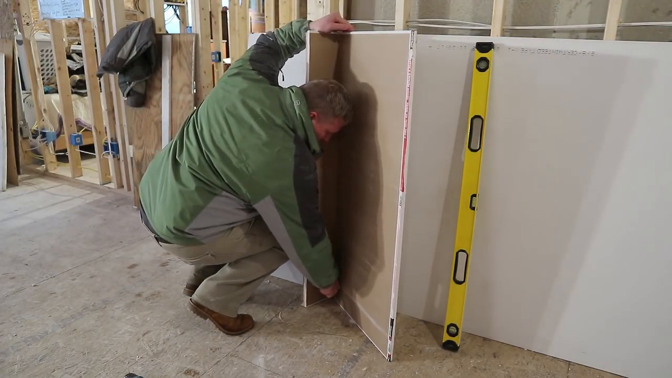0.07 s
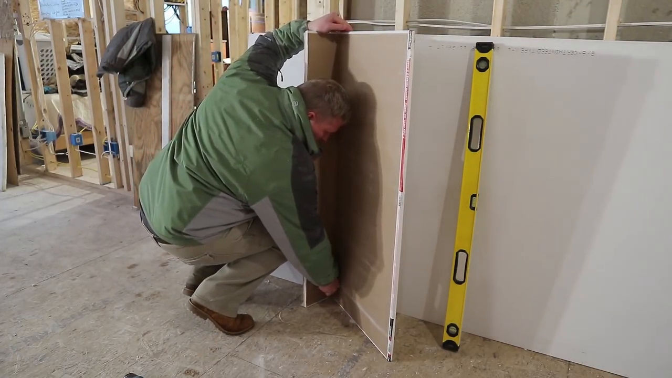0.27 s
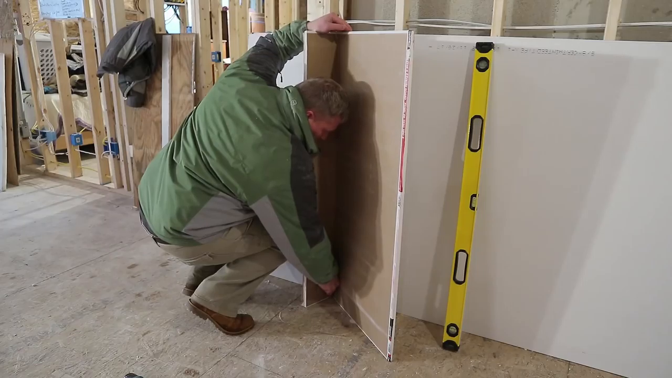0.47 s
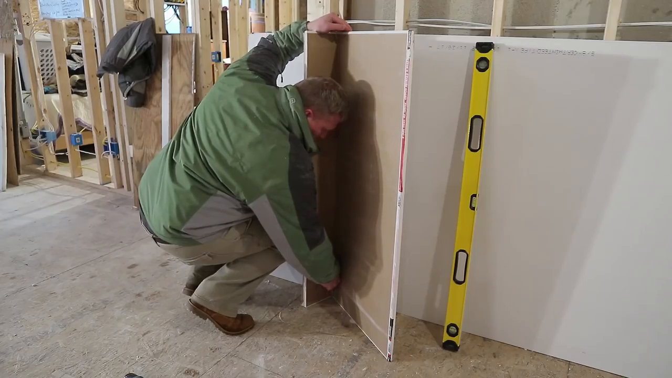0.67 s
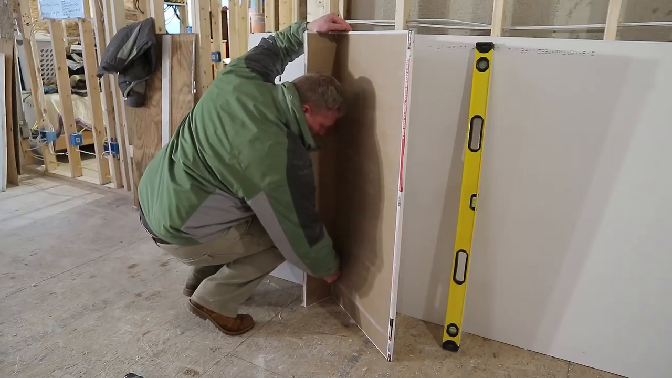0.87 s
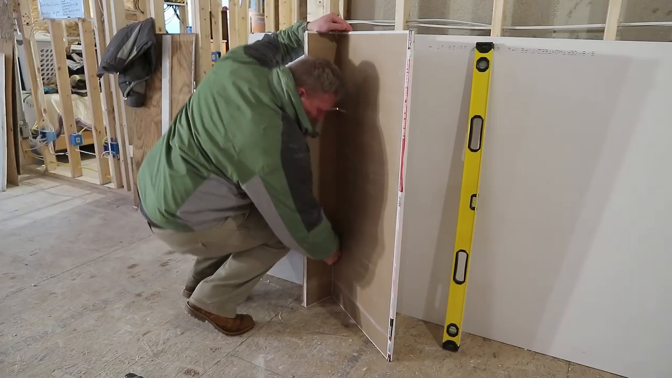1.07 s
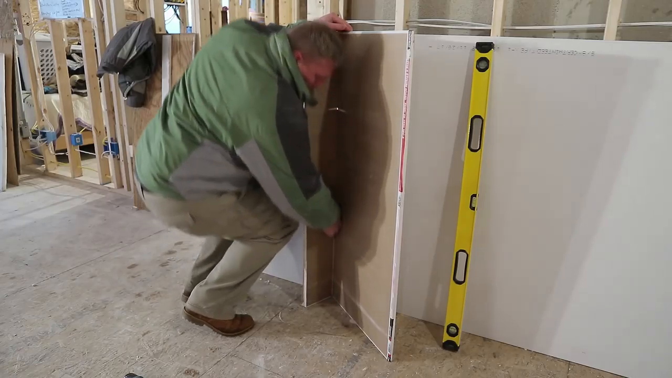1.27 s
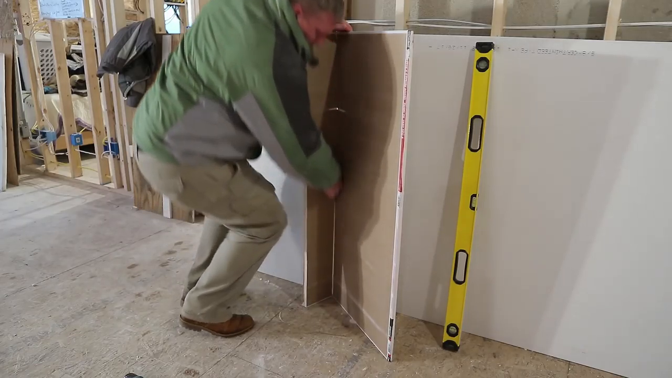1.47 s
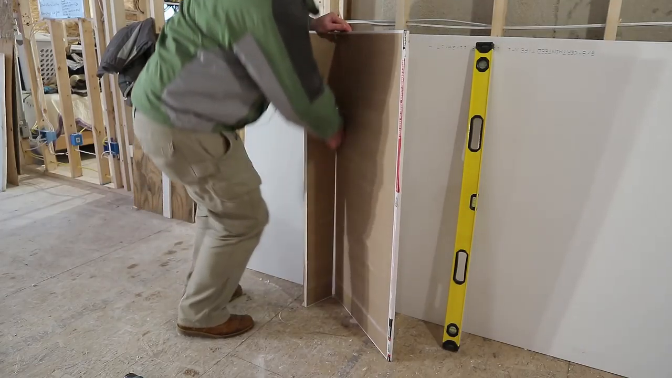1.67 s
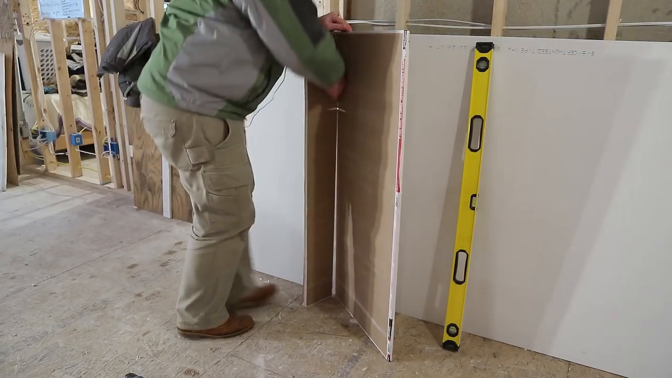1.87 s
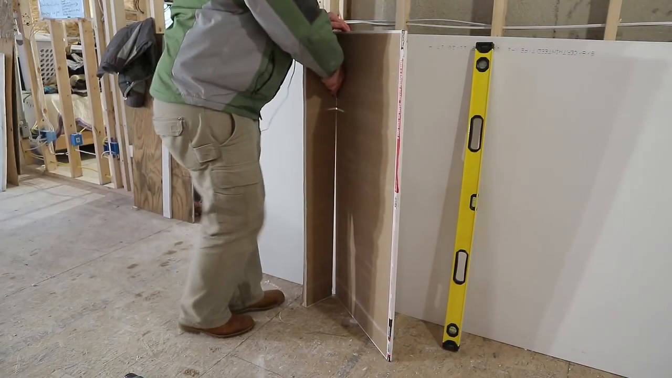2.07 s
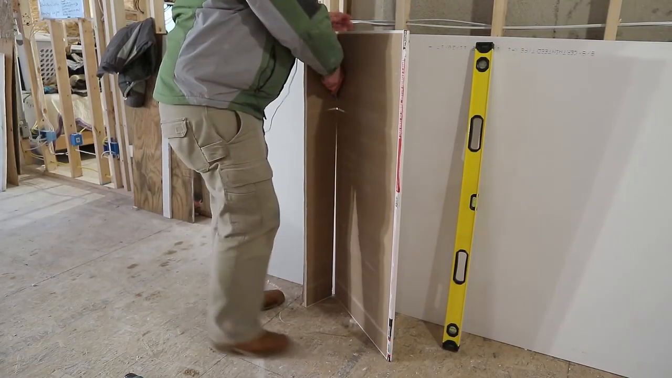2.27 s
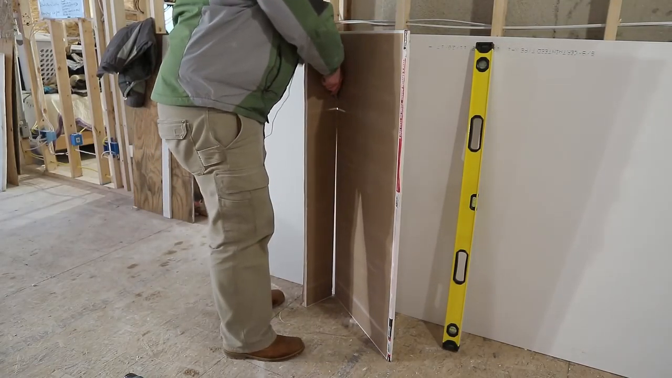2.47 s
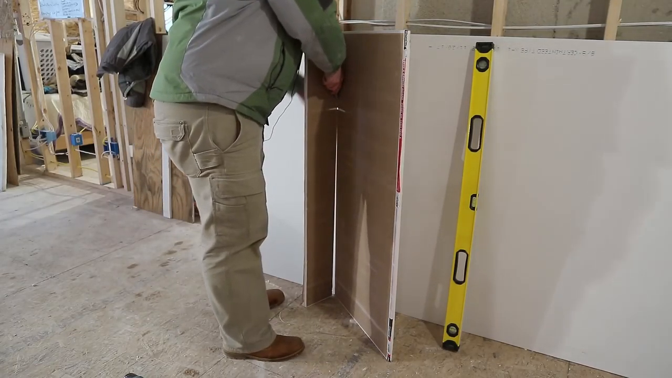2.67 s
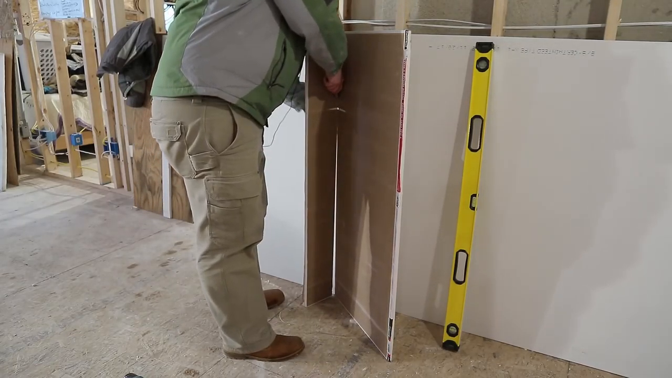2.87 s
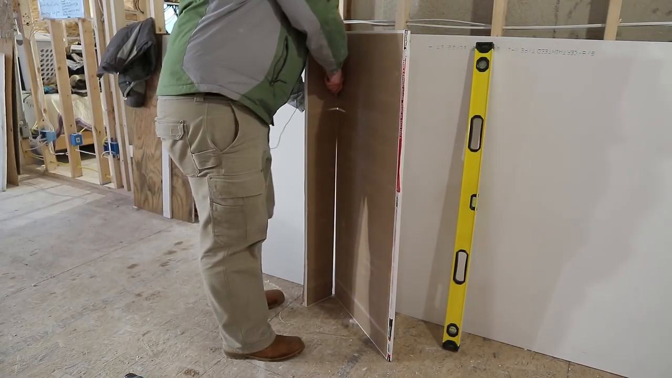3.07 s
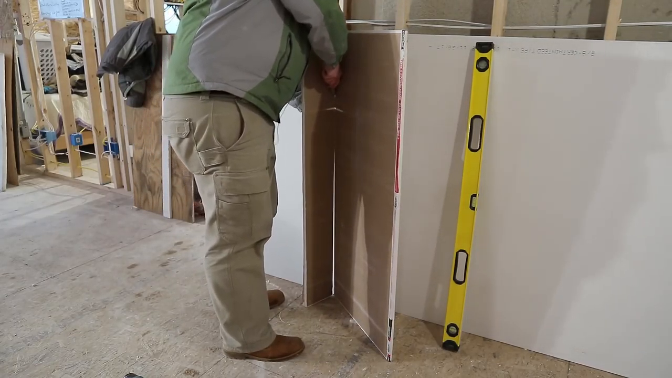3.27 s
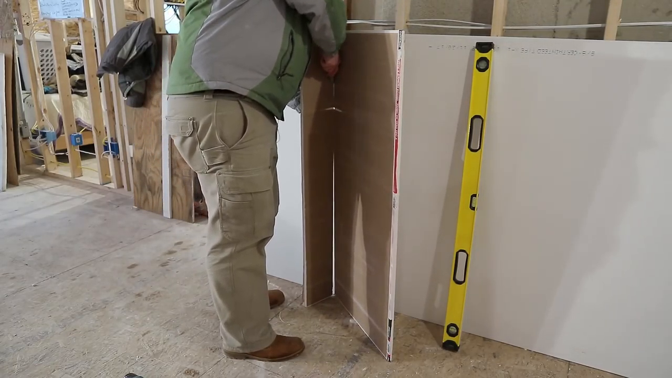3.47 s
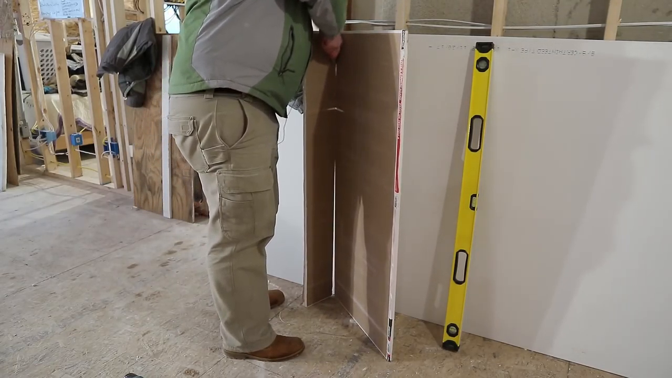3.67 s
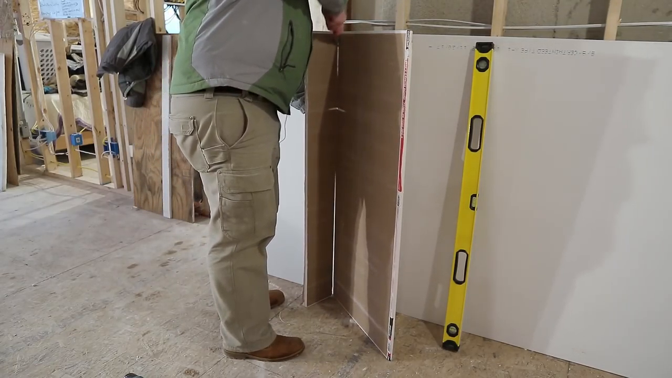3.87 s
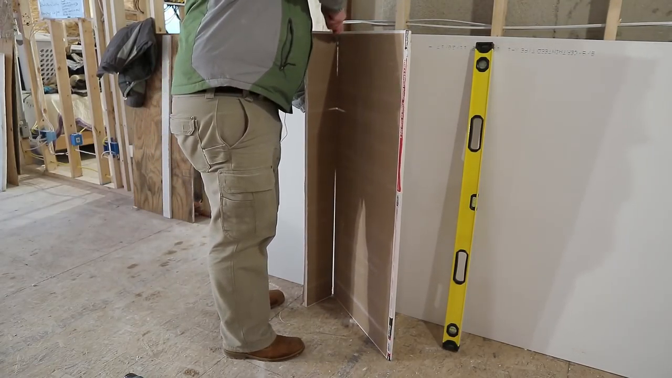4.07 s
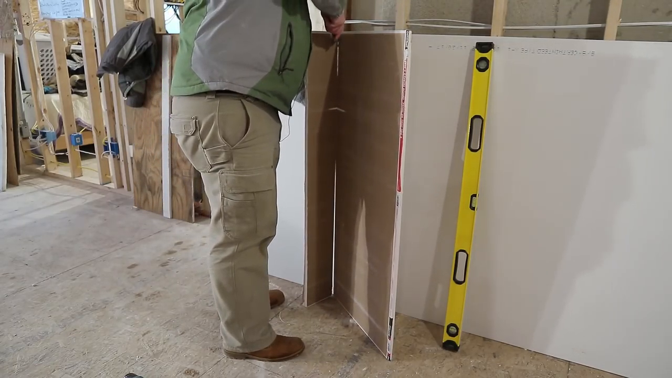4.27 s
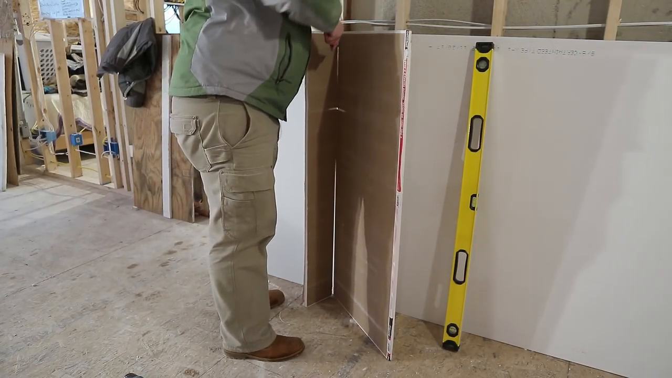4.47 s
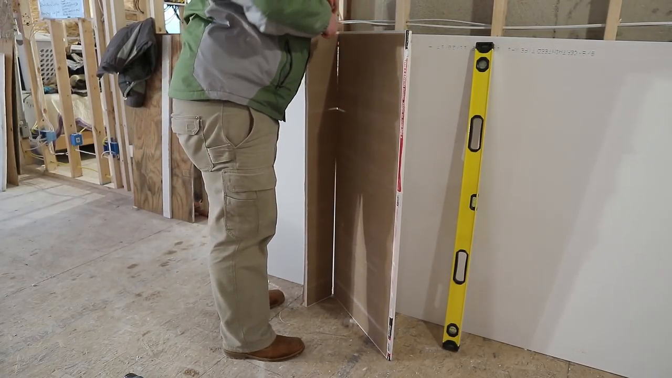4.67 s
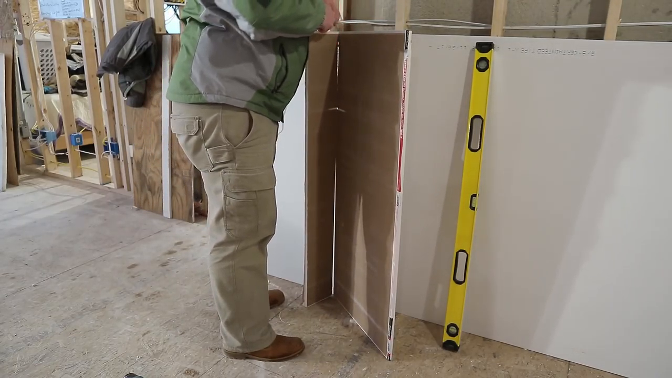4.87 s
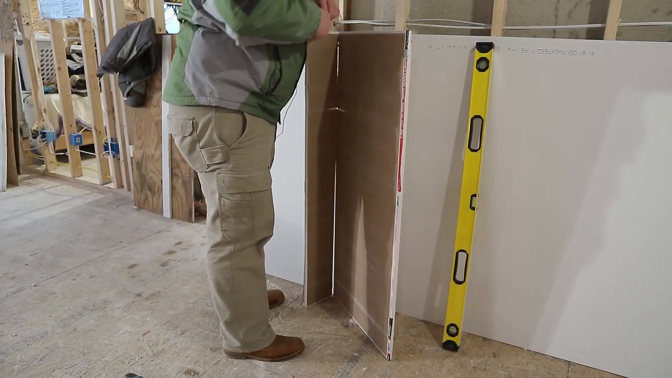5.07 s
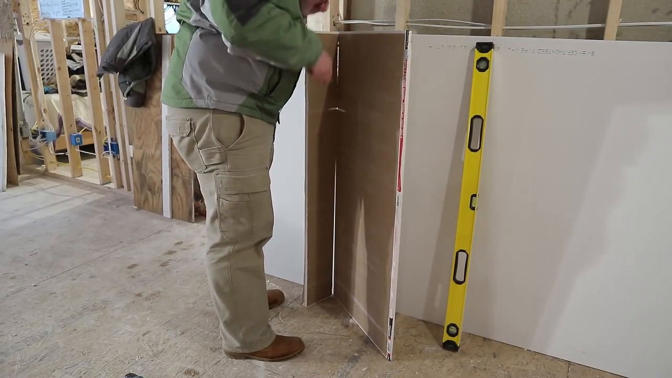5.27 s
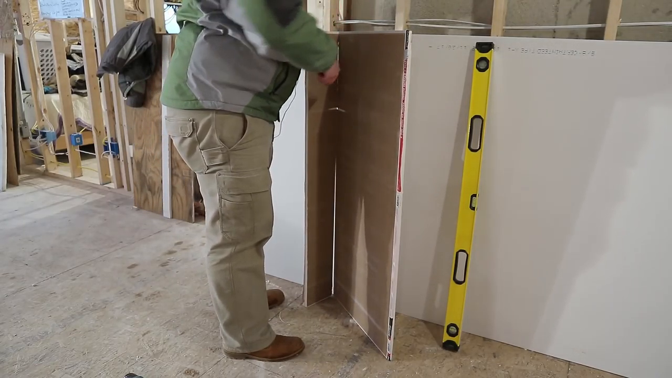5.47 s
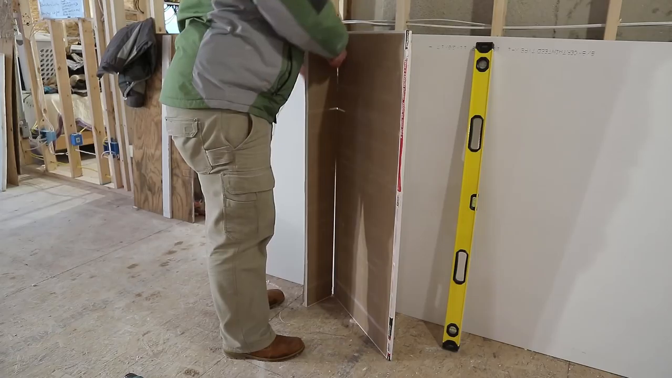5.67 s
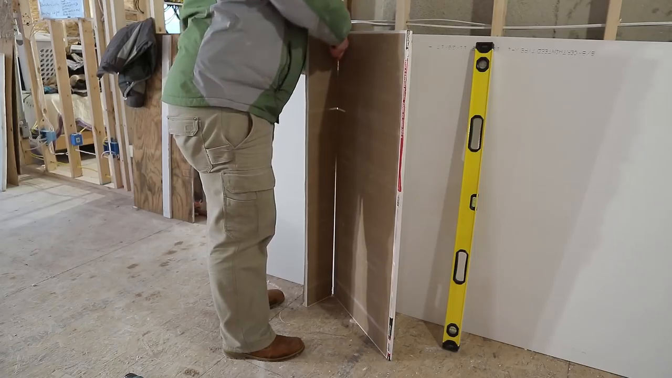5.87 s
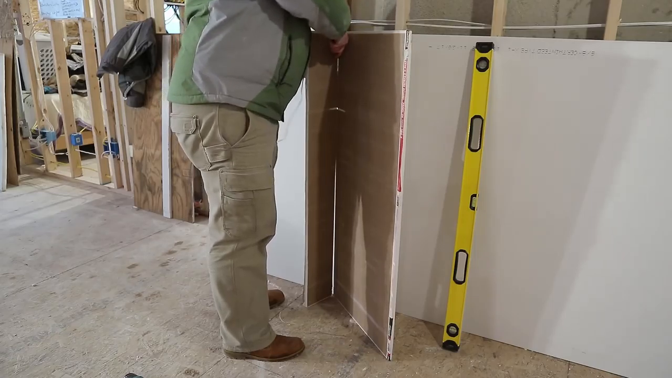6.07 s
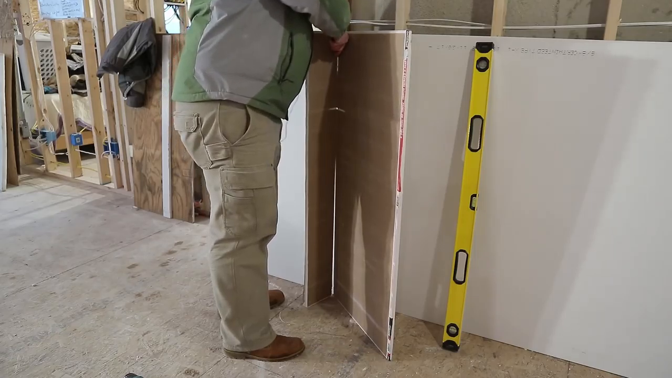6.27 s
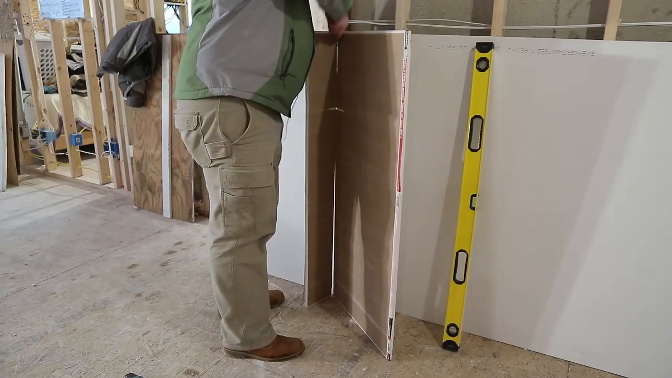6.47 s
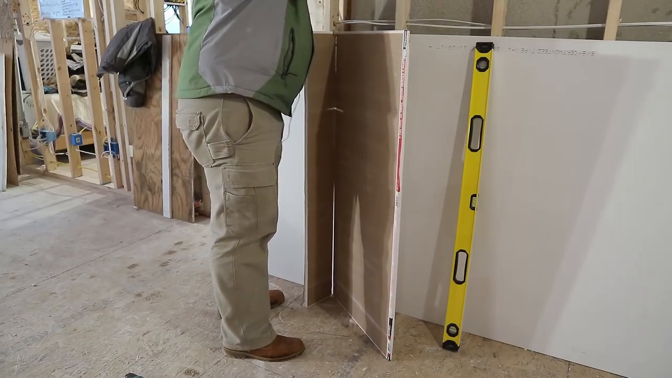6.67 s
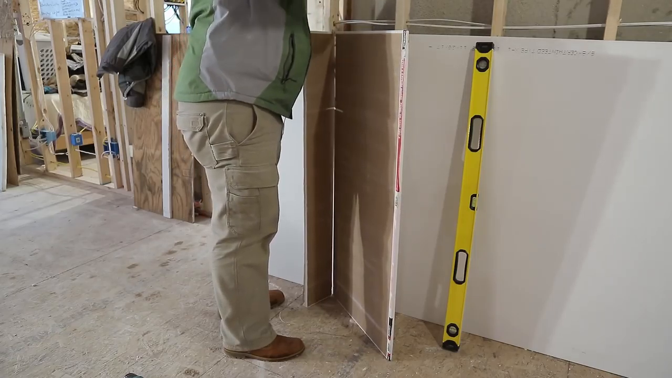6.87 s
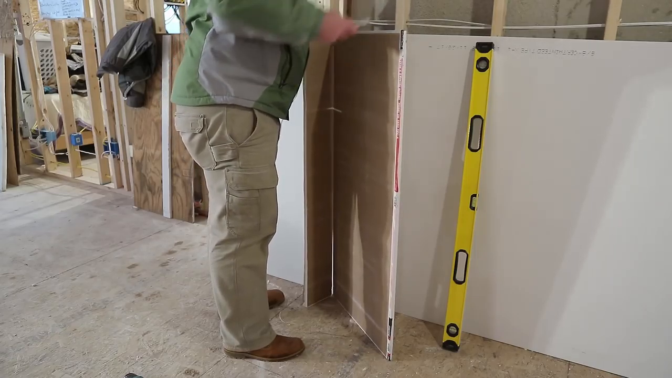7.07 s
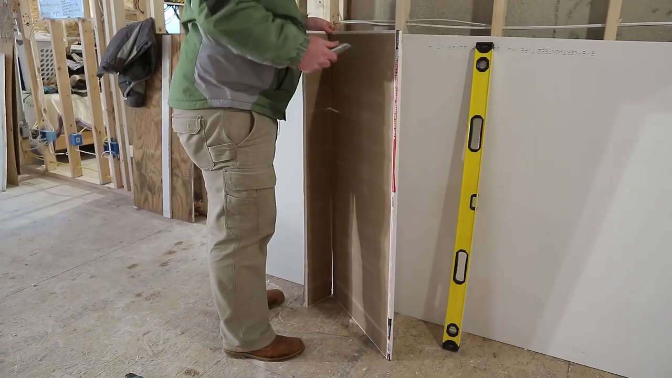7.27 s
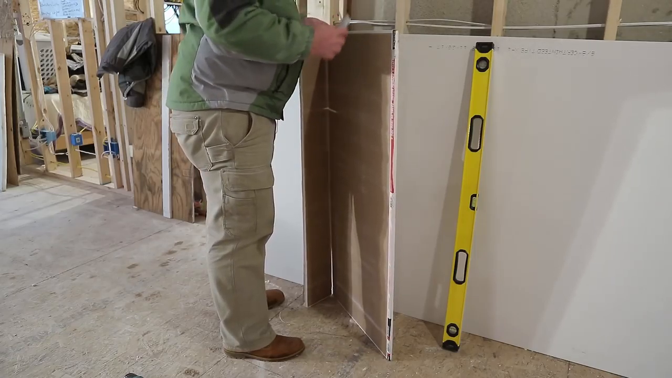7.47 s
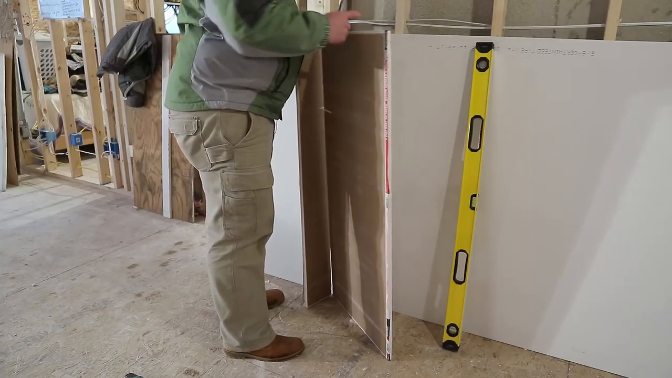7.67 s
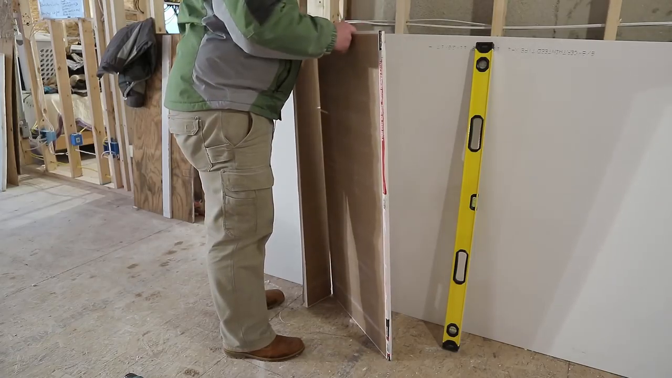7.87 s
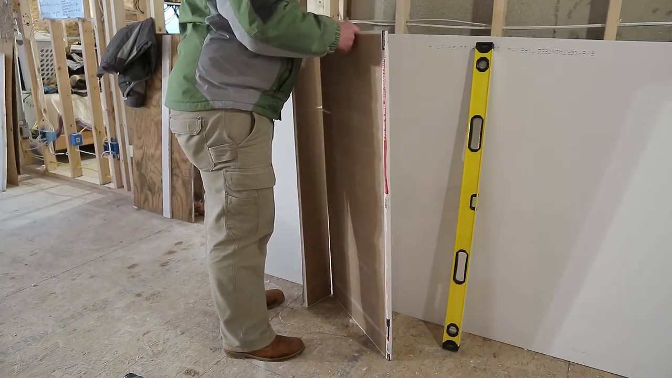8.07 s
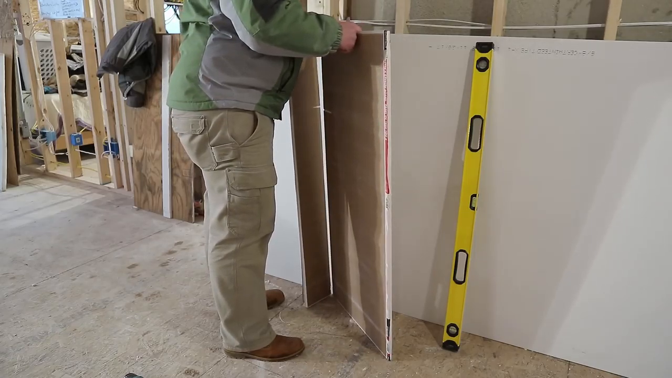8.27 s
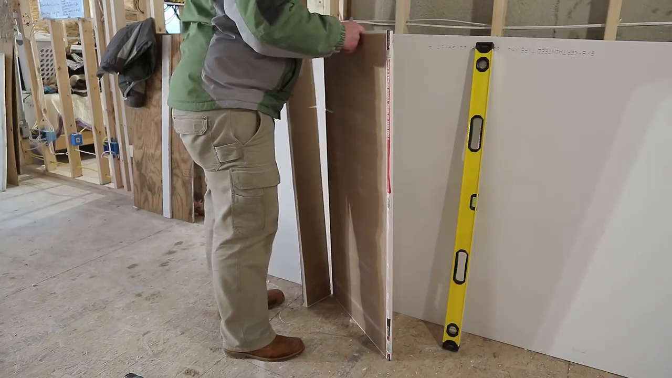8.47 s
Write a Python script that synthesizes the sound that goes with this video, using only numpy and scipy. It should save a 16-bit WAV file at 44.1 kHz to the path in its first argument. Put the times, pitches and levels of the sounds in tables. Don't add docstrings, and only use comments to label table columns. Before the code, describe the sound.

A gypsum board breaks sharply; a utility knife rips its backing upward in gritty strokes, then the blade slider clicks and the loose piece knocks.

```python
import sys
import numpy as np
from scipy import signal
from scipy.fft import rfft, irfft
from scipy.io import wavfile
from scipy.ndimage import uniform_filter1d

SR = 44100
rng = np.random.default_rng(int(sys.argv[2]) if len(sys.argv) > 2 else 0)


def voltage_ratio(decibels):
    exponent = np.asarray(decibels, float) / 20
    return 10 ** exponent


def log_audio(samples):
    frames = np.atleast_2d(samples).T
    limited = np.clip(frames, -1, 1)
    pcm = np.round(limited * 32767).astype(np.int16)
    wavfile.write(sys.argv[1], SR, pcm)


N = 376173

# time in seconds, blade force in dB, slack of the freed piece from 0 to 1.
KNIFE_STROKES = [
    [(0.76, -57, 0), (0.836, -45.5, 0.77), (1.004, -32, 0.13), (1.164, -28.5, 0.06), (1.662, -20, 0),
     (1.866, -21.5, 0), (1.958, -26.5, 0.33), (2.062, -56, 0), (2.2, -84, .3)],
    [(3.2, -65, 0.5), (3.282, -41.5, 0.27), (3.528, -28.5, 0.05), (3.688, -34, 0.52), (3.922, -39, 0.88),
     (4.084, -58, 0.1)],
    [(6.33, -68, 0.9), (6.396, -35.5, 0), (6.44, -37, 0), (6.47, -27, 0), (6.55, -31, 0.44),
     (6.585, -38, 0.8), (6.86, -59, 0.2)],
]
# frequency in Hz, level in dB per Hz.
GRIT_SPECTRUM = [(530, -39), (800, -1.5), (1700, -3.5), (2550, -3.5), (2900, -7), (3300, -10), (3800, -15),
                 (5000, -28.5), (6500, -31), (11000, -120)]
# frequency in Hz, width in Hz, level in dB.
SHEET_RINGS = [
    [(1185, 18, 9.5), (1700, 40, 2.5), (2057, 22, 8), (2500, 57, 9.5), (3220, 44, -3)],
    [(1280, 35, 1), (1690, 86, -3), (2300, 61, 6), (2910, 80, 3), (3380, 37, -4)],
    [(1220, 23, 3), (1670, 44, 4), (2420, 52, -23), (2980, 76, 2)],
]
# frequency in Hz, width in Hz, level in dB.
FOLD_AIR = [
    (612, 235, 3.5),
    (613, 230, -4),
    (757, 260, -2),
]
# frequency in Hz, level in dB per Hz.
DRUM_SPECTRUM = [(53, -39), (90, -23), (140, -15.5), (193, -17), (333, -3.5), (395, -5), (480, -19),
                 (620, -40), (1060, -120)]
# frequency in Hz, level in dB per Hz.
FIBRE_SPECTRUM = [(2060, -41.5), (3500, -17), (3640, -10), (3920, -4), (6090, -8), (8310, -5.5),
                  (9260, -10.5), (10900, -17), (12000, -13.5), (13600, -16.5), (16000, -22)]
# frequency in Hz, level in dB per Hz.
BREAK_SPECTRUM = [(71, -31.5), (120, -26), (403, 9.5), (1300, -2), (2920, -11.5), (3700, -23.5),
                  (4840, -22.5), (8350, -16.5), (15000, -58)]
# time in seconds, crack in dB, crack in Hz, thud in dB, thud in Hz.
BLOWS = [(0.0551, -41, 1760, -39.5, 492), (1.8964, -10, 1090, -14, 325), (2.2279, -29, 1230, -36, 287),
         (2.38, -31.5, 3230, -31, 164), (2.3943, -30, 940, -37, 505), (2.4104, -29.5, 1330, -47, 143),
         (2.6, -47, 1010, -52, 393), (2.9425, -37.5, 2360, -44, 340), (5.7935, -35, 1620, -48, 129),
         (6.212, -37, 1800, -52, 380), (6.0798, -30, 1680, -47, 370), (6.5072, -16, 1220, -54, 720),
         (6.603, -18, 2400, -35, 290), (7.003, -42, 1020, -48, 483), (7.226, -37.5, 1780, -41.5, 224),
         (7.812, -50, 958, -39, 290), (7.89, -23, 920, -22.5, 300)]
# time in seconds, level in dB, crack in Hz.
FINGER_TAPS = [(0.027, -41, 740), (0.2713, -42, 1900), (0.5015, -38, 1048), (2.792, -40, 1090),
               (2.8686, -43, 1230), (4.886, -48, 1280), (5.3634, -52, 1140), (5.931, -43.5, 1670),
               (5.992, -42, 2280), (8.4813, -49, 890)]
# frequency in Hz, level in dB, T60 in seconds.
BOARD_MODES = [(296, 11, 0.092), (382, -1, 0.18), (562, -9.5, 0.56), (703, -12.5, 1.23), (790, -21.5, 1.5),
               (924, -25.5, 0.59), (1033, -24, 0.29), (1192, -6.5, 0.19)]
# frequency in Hz, level in dB, T60 in seconds.
PIECE_MODES = [(126, -16, 0.26), (253, -7.5, 0.33), (401.3, -7.5, 0.42), (540, -10.5, 0.41), (706, 2, 0.44),
               (738, -5, .4), (797, -3, .33), (886, -6, 0.29), (968, -8.5, 0.22), (1082, -10, 0.24),
               (1205, -8, 0.36), (1503, -13, .28), (1652, -16, .3), (1827, -15, .26)]
# time in seconds, level in dB, frequency in Hz favoured by the
# spot struck, tilt away from it in dB per octave, share of the free ring that the grip allows from 0 to 1.
PIECE_TOUCHES = [(5.79, -50, 1650, 4, .7), (5.926, -47, 1650, 5, .4), (6.078, -40, 740, 8, 1.0),
                 (6.205, -47, 740, 8, .7), (6.455, -31, 780, 8, .4), (7.812, -46, 400, 5, .6),
                 (7.889, -21, 600, 4, .55), (7.935, -30, 710, 9, .5)]
# time in seconds, level in dB, brightness in dB.
SLIDER_CLICKS = [(7.476, -13.5, -2), (7.4933, -14.5, -8), (7.4964, -43, -21.5), (7.5122, -14.5, -6),
                 (7.5139, -21, -14), (7.537, -23, -11)]
# frequency in Hz, level in dB, T60 in seconds.
KNIFE_MODES = [(1760, 12, 0.51), (1850, 10, 0.3), (2800, 5, 0.17), (3327, 18, 0.28), (3370, 11, 0.23),
               (3800, -3, 0.12), (4500, 0, 0.22), (5500, 8, 0.2), (6150, 1, .15), (8000, 16, 0.14)]
# time in seconds, level in dB, ring in Hz, relative treble in dB.
PAPER_TICKS = [(0.028, -42, 3980, -6), (0.151, -57, 4244, 7), (0.265, -62, 3760, 9), (0.82, -39, 6420, -6),
               (2.012, -28, 4100, -11), (2.225, -34, 4020, -12), (2.394, -31, 3180, -11),
               (2.942, -48, 3200, -2), (3.902, -18.5, 3960, -4), (3.984, -23, 4160, -7.5),
               (4.0194, -47, 3980, 7), (4.173, -47, 3430, -19), (4.186, -45, 3800, -8),
               (5.792, -38.5, 3840, -11), (5.927, -45, 3600, -5), (5.985, -48, 5000, -2),
               (6.03, -50, 4500, -2), (6.076, -41.5, 3340, -3), (6.17, -48, 5000, -3),
               (6.215, -46, 4500, -6), (6.6027, -20.5, 5600, -2.5), (6.721, -32.5, 3900, -4),
               (6.831, -43.5, 5470, -1), (6.908, -36, 4155, -7.5), (7.0674, -33.5, 4760, -5),
               (7.4, -44, 5950, -10), (7.765, -48, 9000, 2), (7.858, -42, 6440, -9),
               (7.889, -38.5, 5030, 0), (8.075, -42.5, 3950, -4), (8.1168, -40.5, 8450, -1),
               (8.3194, -59, 4500, 11)]
# time in seconds, fall time in seconds, level in dB,
# frequency in Hz, width in Hz.
EDGE_BUZZES = [(7.5, 0.042, -39, 1790, 100), (2.41, .07, -44, 37, 30), (6.905, 0.014, -37, 4150, 800),
               (2.395, 0.032, -42.5, 144, 67), (3.77, 0.045, -41, 4250, 450),
               (7.89, 0.011, -25, 1680, 1300), (2, 0.05, -47, 275, 140), (0.03, 0.03, -46, 620, 80),
               (5.96, .04, -56, 2300, 120), (5.803, 0.014, -41.5, 383, 83)]
# time in seconds, length in seconds, level in dB,
# centre in Hz, width in Hz.
RUBS = [(0.42, 0.14, -51.5, 800, 1210), (2.207, 0.11, -49.5, 1220, 910), (3.69, 0.098, -46, 4320, 500),
        (3.083, 0.087, -53.5, 1530, 2460), (4.256, 0.098, -57.5, 1490, 2500),
        (5.012, 0.14, -64, 4600, 2000), (5.786, 0.51, -63, 134, 70), (5.951, 0.096, -52, 1700, 2500),
        (6.163, 0.03, -44.5, 2530, 2450), (6.188, 0.04, -41, 1760, 1320), (6.172, 0.04, -57, 8000, 1500),
        (6.314, 0.071, -52, 7400, 2000), (7.065, 0.069, -48.5, 4500, 1500), (7.08, 0.035, -49, 7400, 2980),
        (7.24, 0.039, -51.5, 1700, 1960), (7.816, 0.073, -48.5, 1280, 497), (8.19, 0.07, -56, 3600, 1800),
        (8.167, 0.088, -52.5, 9300, 9000), (8.44, 0.081, -52.5, 895, 1500)]
# middle in seconds, length in seconds, palms in dB, jacket in dB.
HAND_GESTURES = [(0.0, 0.63, -49.5, -65.5), (0.275, 0.72, -53.5, -65.5), (0.502, 0.28, -44.5, -60.5),
                 (2.225, 0.13, -45, -61), (2.422, 0.42, -45.5, -60.5), (2.81, 0.73, -50.5, -65.5),
                 (3.132, 0.34, -53, -83), (4.137, 0.22, -48.5, -67), (4.494, 0.66, -51, -63),
                 (5.254, 0.34, -55, -66.5), (5.56, 0.67, -51, -57.5), (5.897, 1, -57, -62),
                 (6.25, 0.31, -48, -54.5), (6.973, 0.83, -50.5, -61), (7.223, 0.71, -52.5, -71),
                 (7.564, 0.52, -48.5, -57), (7.836, 0.46, -52, -58), (8.133, 0.44, -54.5, -60.5),
                 (8.454, 0.71, -58, -62)]
# frequency in Hz, level in dB per Hz.
PALM_SPECTRUM = [(71, -52.5), (120, -24), (194, -12), (387, -7.5), (427, -5), (543, -9), (644, -4.5),
                 (3500, -18), (4550, -37), (7700, -120)]
# frequency in Hz, level in dB per Hz.
JACKET_SPECTRUM = [(1470, -36), (2500, -1.5), (3080, -8), (3490, -2), (5830, -3), (8460, -2),
                   (10700, -15.5), (13200, -9), (16000, -21)]
# peak in seconds, level in dB, build-up in seconds.
SHEET_FLEXES = [(0.0, -58, .05), (0.59, -48, 0.054), (1.31, -42, 0.58), (1.92, -36, 0.055),
                (2.44, -55, 0.1), (3.75, -40.5, 0.56), (3.92, -42.5, 0.19), (4.16, -62, 0.21),
                (5.8, -65, .06), (6.63, -44, 0.49), (7.32, -57, 0.25), (7.91, -58, 0.088)]
# frequency in Hz, T60 in seconds.
ROOM_DECAY = [(100, 0.97), (300, 0.42), (800, 0.43), (2000, 0.46), (5000, 0.46), (14000, 0.32)]
# frequency in Hz, level in dB per Hz.
AIR_SPECTRUM = [(15, -40), (25, -4), (48, -2), (149, -4.5), (293, 5), (335, -0.5), (607, 1), (1290, -4),
                (1560, -6), (3720, -14), (14400, -20), (16000, -26.5)]


def evened(x):
    return x / np.sqrt(np.mean(x ** 2) + 1e-20)


def peak(x):
    return x / np.sqrt(uniform_filter1d(x ** 2, 176).max())


def read(points, hz):
    f, value = np.transpose(points)
    return np.interp(np.log(hz + 1), np.log(f + 1), value)


def add(mix, s, sound):
    part = mix[max(round(s * SR), 0):][:len(sound)]
    part += sound[:len(part)]


def colour(x, spectrum):
    gain = voltage_ratio(read(spectrum, np.fft.rfftfreq(len(x), 1 / SR)))
    return evened(irfft(rfft(x) * gain, len(x)))


def band(x, lo_hz, hi_hz):
    sos = signal.butter(3, [lo_hz, min(hi_hz, SR / 2 - 1)], "band", fs=SR, output="sos")
    return signal.sosfilt(sos, x)


def resonate(x, hz, width):
    r = np.exp(-np.pi * width / SR)
    return 2 * signal.lfilter([1 - r], [1, -r * np.exp(2j * np.pi * hz / SR)], x).real


def wandering(x, hz, width, swing):
    knots = np.clip(rng.standard_normal(len(x) // 5000 + 2), -2, 2)
    drift = np.interp(np.arange(len(x)) / 5000, np.arange(len(knots)), knots)
    turn = np.exp(2j * np.pi * np.cumsum(hz * (1 + swing * drift)) / SR)
    r = np.exp(-np.pi * width / SR)
    smooth = signal.lfilter([1], np.convolve([1, -r], [1, -r]), x / turn)
    return evened((turn * smooth).real)


def ring(modes, weights_db, damping=1.):
    t, out = np.arange(SR // 4) / SR, 0
    for (hz, db, t60), weight in zip(modes, weights_db):
        decay_db = -60 * t / (min(t60, .5) * damping)
        out = out + voltage_ratio(db + weight + decay_db) * np.sin(2 * np.pi * hz * t)
    return out


def bend(x, spread):
    f = np.fft.rfftfreq(SR // 2, 1 / SR)
    return irfft(rfft(x, SR // 2) * np.exp(-4j * np.pi * spread * np.sqrt(f)))


def burst(noise, length_s):
    u = np.arange(len(noise)) / SR / max(length_s, .0003)
    return noise * u * np.exp(-u)


def grains(per_s, spread_db, clump_s, clump_db):
    happens = rng.random(N) < per_s / SR
    size = np.minimum(rng.exponential(1, N), 5)
    sign, slow = rng.standard_normal(N), rng.standard_normal(N)
    samples = int(clump_s * SR)
    clumps = evened(uniform_filter1d(uniform_filter1d(slow, samples), samples))
    return evened(happens * sign * voltage_ratio(spread_db * size + clump_db * clumps))


def patchy(x, depth_db, wide_hz, long_s):
    z = signal.stft(x, SR, nperseg=512)[2]
    field = rng.standard_normal(z.shape[::-1]).T
    for _ in range(2):
        field = uniform_filter1d(field, max(int(wide_hz * 512 / SR), 1), 0)
        field = uniform_filter1d(field, int(long_s * SR / 256), 1)
    return evened(signal.istft(z * voltage_ratio(depth_db * evened(field)), SR, nperseg=512)[1][:len(x)])


def level(tables, column):
    t = np.arange(N) / SR
    return sum(voltage_ratio(np.interp(t, r[:, 0], column(r), -200, -200)) for r in map(np.array, tables))


def follow(strokes, grip, tight_db, slack_db):
    middle_db = -30.5
    return level(strokes, lambda r: middle_db + grip * (r[:, 1] - middle_db) + tight_db + slack_db * r[:, 2])


def blade():
    slips = grains(per_s=9000, spread_db=1.2, clump_s=.006, clump_db=1.3)
    broad, grit, fold = colour(slips, GRIT_SPECTRUM), np.zeros(N), 0
    for stroke, modes, (fold_hz, fold_width, fold_db) in zip(KNIFE_STROKES, SHEET_RINGS, FOLD_AIR):
        span = slice(round(stroke[0][0] * SR), round(stroke[-1][0] * SR))
        rings = 0
        for hz, width, db in modes:
            rings = rings + voltage_ratio(.6 * db) * wandering(slips[span], hz, 2.5 * width + 110, swing=.06)
        force = level([stroke], lambda r: r[:, 1])[span]
        grit[span] = force * evened(broad[span] + voltage_ratio(-10.5) * evened(rings))
        fold_gain = follow([stroke], grip=.75, tight_db=-6 + fold_db, slack_db=4)
        fold = fold + fold_gain * evened(resonate(band(slips, 487, 992), fold_hz, fold_width))
    grit = np.std(grit) * patchy(grit, depth_db=2.1, wide_hz=220, long_s=.05)
    drum = colour(grains(per_s=2500, spread_db=3.0, clump_s=.0057, clump_db=1.0), DRUM_SPECTRUM)
    drum = follow(KNIFE_STROKES, grip=1, tight_db=-15.5, slack_db=19) * drum
    fibres = grains(per_s=7000, spread_db=2., clump_s=.006, clump_db=1.2)
    fizz = patchy(colour(.4 * slips + fibres, FIBRE_SPECTRUM), depth_db=2.5, wide_hz=700, long_s=.05)
    fizz = follow(KNIFE_STROKES, grip=1, tight_db=-16, slack_db=15) * fizz
    return voltage_ratio(-0.5) * grit + voltage_ratio(-1.5) * fold + voltage_ratio(-1.5) * drum + voltage_ratio(0.34) * fizz


def snap():
    t, out, jolt = np.arange(-620, 500) / SR, np.zeros(N), np.zeros(SR // 4)
    crackle = evened(band(rng.standard_normal(len(t)), 1340, 3850))
    add(out, .554, voltage_ratio(-10.0 + np.minimum(3200 * t, -2600 * t)) * crackle)
    add(jolt, .01, burst(.5 + rng.standard_normal(600), .0009))
    add(out, .5555, voltage_ratio(-7) * bend(peak(colour(jolt, BREAK_SPECTRUM)), 0.11))
    spray = burst(rng.standard_normal(900), 0.004)
    add(out, .567, voltage_ratio(-29.5) * peak(band(spray, 4500, 17000)))
    swing = burst(np.ones(900), 0.00026)
    add(out, .5705, voltage_ratio(-7) * peak(resonate(swing, 342, 92)))
    thump = burst(rng.standard_normal(9000), 0.0086)
    add(out, .572, voltage_ratio(-19.5) * peak(band(thump, 190, 820)))
    shudder = colour(rng.standard_normal(9000), BREAK_SPECTRUM) * np.exp(-np.arange(9000) / SR / 0.08)
    add(out, .571, voltage_ratio(-26.0) * shudder)
    return out


def knocks():
    taps = [(s, db, hz, db - 10, 640) for s, db, hz in FINGER_TAPS]
    blows = sorted(BLOWS + taps)
    out, noise, contact_s = np.zeros(N), rng.standard_normal((len(blows), 2, 9000)), .0028
    for (s, crack_db, crack_hz, thud_db, thud_hz), (a, b) in zip(blows, noise):
        push = burst(a, contact_s)
        broad = peak(band(band(push, 800, 2. * crack_hz), 560, 3.1 * crack_hz))
        pitched = peak(resonate(resonate(push, crack_hz, 450), crack_hz, 800))
        crack = peak(broad + 0.96 * pitched)
        near_db = -14 * abs(np.log2(np.array(BOARD_MODES)[:, 0] / thud_hz))
        answer = signal.fftconvolve(burst(b, 2.5 * contact_s), ring(BOARD_MODES, near_db, damping=.28))
        blow = .4 * peak(band(answer, 100, 1400))
        add(blow, 0, 0.47 * peak(band(burst(b, 1.3 * contact_s), 0.63 * thud_hz, 1.72 * thud_hz)))
        add(blow, 0, .5 * peak(resonate(burst(a[::-1], 4 * contact_s), thud_hz, 60)))
        blow = voltage_ratio(thud_db - .5) * peak(band(blow, thud_hz / 4.5, 2200))
        add(blow, 0, voltage_ratio(crack_db - 6.5) * crack)
        add(out, s - .004, bend(blow, 0.025))
    return out


def piece():
    out = np.zeros(N)
    for s, db, hz, tilt_db, free in PIECE_TOUCHES:
        near_db = -tilt_db * abs(np.log2(np.array(PIECE_MODES)[:, 0] / hz))
        wave = bend(ring(PIECE_MODES, near_db, damping=free), .12)
        add(out, s - .003, voltage_ratio(db) * peak(band(wave, 90, 3000)))
    return out


def slider():
    out, noise = np.zeros(N), rng.standard_normal((len(SLIDER_CLICKS), 4000))
    places = rng.standard_normal((len(SLIDER_CLICKS), len(KNIFE_MODES) + 2))
    for (s, db, bright_db), z, place in zip(SLIDER_CLICKS, noise, places):
        body = 0.66 * peak(signal.fftconvolve(burst(z, 0.0016), ring(KNIFE_MODES, 2.1 * place, damping=0.18)))
        add(body, 0, voltage_ratio(bright_db - 3.0) * peak(band(burst(z, 0.00093), 5400, 14000)))
        add(body, 0, 0.45 * peak(band(burst(z[::-1], 0.0019), 1830, 4240)))
        add(body, 0, 0.5 * peak(band(burst(np.roll(z, 999), 0.0053), 3300, 9400)))
        add(out, s - .0007, voltage_ratio(db - 11.5) * peak(band(body, 860, 17000)))
    return out


def ticks():
    out, noise = np.zeros(N), rng.standard_normal((len(PAPER_TICKS), 2, 4000))
    for (s, db, hz, top_db), (a, b) in zip(PAPER_TICKS, noise):
        length_s = 13.1 / hz
        brief_ring = resonate(resonate(burst(a, 1.5 * length_s), hz, 800), hz, 800)
        body = evened(band(burst(a, length_s), 3000, 7000)) + 1.1 * evened(brief_ring)
        top = peak(band(burst(b, length_s), 5900, 14000))
        add(out, s - .001, voltage_ratio(db - 10.0) * (peak(body) + voltage_ratio(top_db) * top))
    return out


def buzzes():
    out, noise, t = np.zeros(N), rng.standard_normal((len(EDGE_BUZZES), 12000)), np.arange(12000) / SR
    for (s, fall_s, db, hz, width), z in zip(EDGE_BUZZES, noise):
        once = resonate(z * np.exp(-t / fall_s), hz, width)
        add(out, s, voltage_ratio(db) * peak(resonate(once, hz, 0.97 * width)))
    return out


def scuffs():
    out, rubbing = np.zeros(N), grains(per_s=4600, spread_db=1.0, clump_s=.0046, clump_db=1.5)
    for s, length_s, db, hz, width in RUBS:
        part = rubbing[round(s * SR):][:round(length_s * SR)]
        rub = evened(resonate(resonate(part, hz, width), hz, 1.1 * width))
        add(out, s, voltage_ratio(db) * rub * signal.windows.tukey(len(part), .6))
    return out


def handling():
    palms = colour(grains(per_s=2500, spread_db=3., clump_s=.02, clump_db=1.8), PALM_SPECTRUM)
    jacket = colour(grains(per_s=8000, spread_db=2.2, clump_s=.015, clump_db=2.2), JACKET_SPECTRUM)
    middle_s, length_s, palms_db, jacket_db = np.transpose(HAND_GESTURES)
    phase = np.clip((np.arange(N)[:, None] / SR - middle_s) / length_s, -.5, .5)
    arch = np.cos(np.pi * phase) ** (2 * 1.08)
    return np.sqrt(arch @ voltage_ratio(2 * palms_db - 14)) * palms + np.sqrt(arch @ voltage_ratio(2 * jacket_db - 2.5)) * jacket


def wobble():
    peak_s, db, build_s = np.transpose(SHEET_FLEXES)
    late = np.arange(N)[:, None] / SR - peak_s
    shape_db = np.minimum(28.5 * late / build_s, -71 * late)
    gain = voltage_ratio(db + shape_db).sum(1) + voltage_ratio(-77)
    return voltage_ratio(-3.0) * gain * evened(resonate(band(rng.standard_normal(N), 21, 190), 52, 70))


def room(x):
    out, at, turn = np.zeros(N), np.arange(200, SR - 20, 20), np.arange(N) / SR * np.pi / .4
    for k in range(3):
        taps = np.zeros(SR)
        taps[at + rng.integers(0, 20, len(at))] = rng.choice([-1., 1.], len(at))
        hz, t, z = signal.stft(taps, SR, nperseg=256)
        tail = signal.istft(z * voltage_ratio(-60 * t / read(ROOM_DECAY, hz)[:, None]), SR, nperseg=256)[1]
        share = np.sqrt(2 / 3) * np.cos(turn + k * np.pi / 3)
        out += signal.fftconvolve(x * share, tail / np.linalg.norm(tail))[:N]
    return out


def background_air():
    return voltage_ratio(-61 - 1.5) * colour(rng.standard_normal(N), AIR_SPECTRUM)


def scene():
    rubs = blade() + handling() + scuffs()
    blows = knocks() + buzzes() + piece()
    clicks, crack = ticks() + slider(), snap()
    wet = room(voltage_ratio(-5.5) * rubs + voltage_ratio(-5.5) * blows + voltage_ratio(-7.5) * clicks + voltage_ratio(-13.0) * crack)
    return (rubs + blows + clicks + crack + wet + wobble() + background_air())[None]


def roll_off(x):
    return signal.sosfilt(signal.butter(12, 16450, fs=SR, output="sos"), x)


def record(dry):
    rolled = signal.sosfilt(signal.butter(4, 38, "high", fs=SR, output="sos"), dry)
    limited = signal.oaconvolve(rolled, signal.firwin(255, 15900, fs=SR)[None], "same")
    mix = .86 * np.tanh(limited / .86)
    return roll_off(mix)


dry = scene()
out = record(dry)
log_audio(out)
```